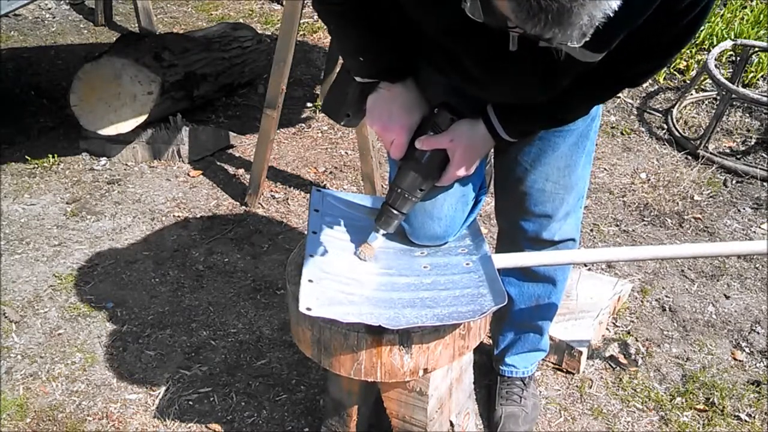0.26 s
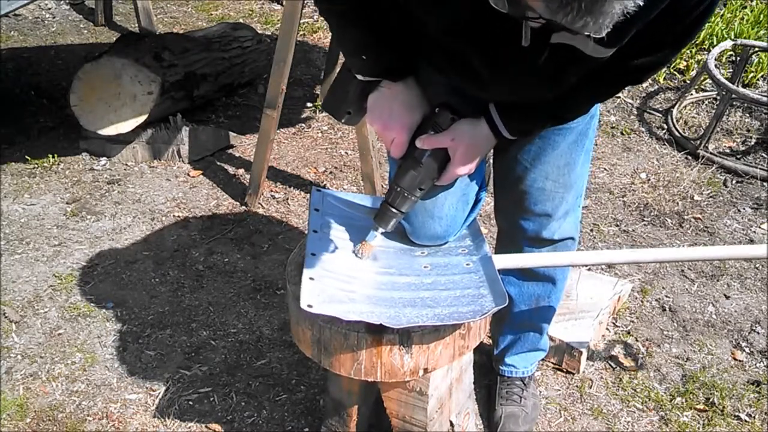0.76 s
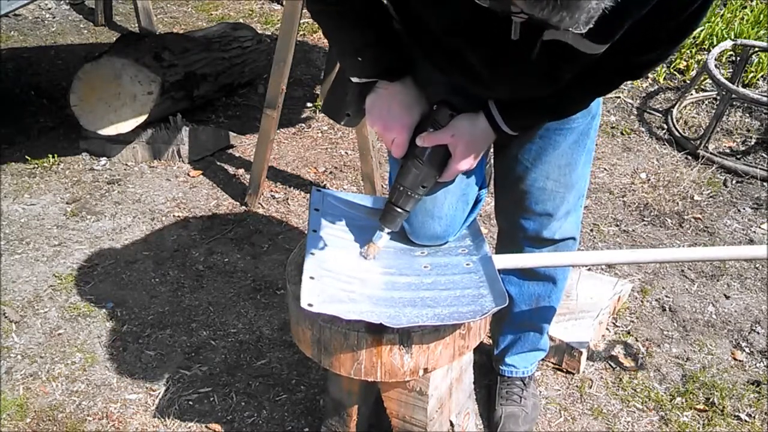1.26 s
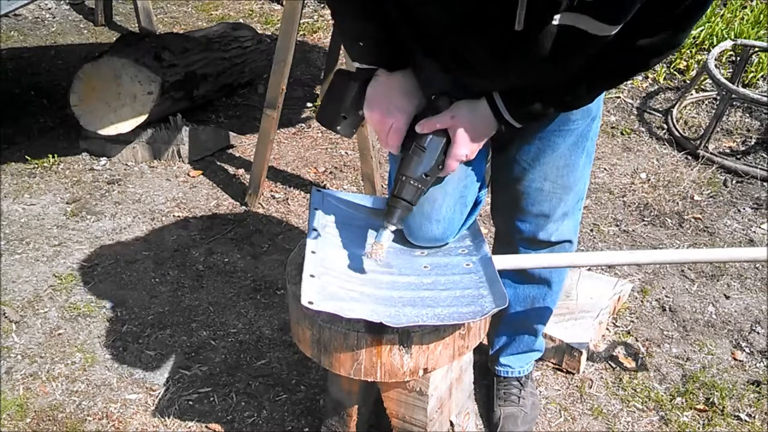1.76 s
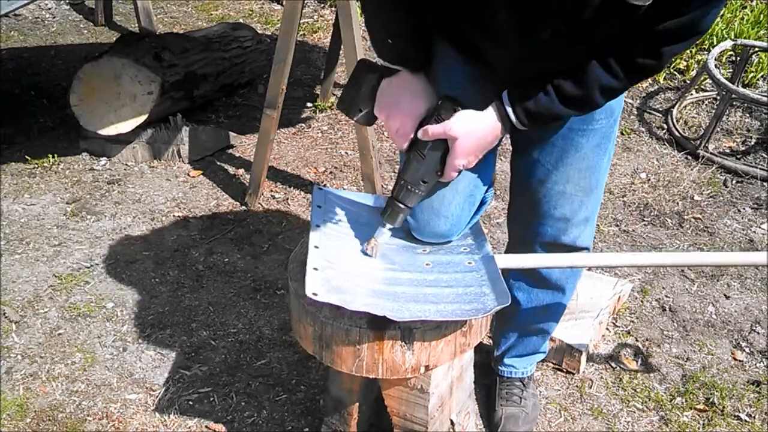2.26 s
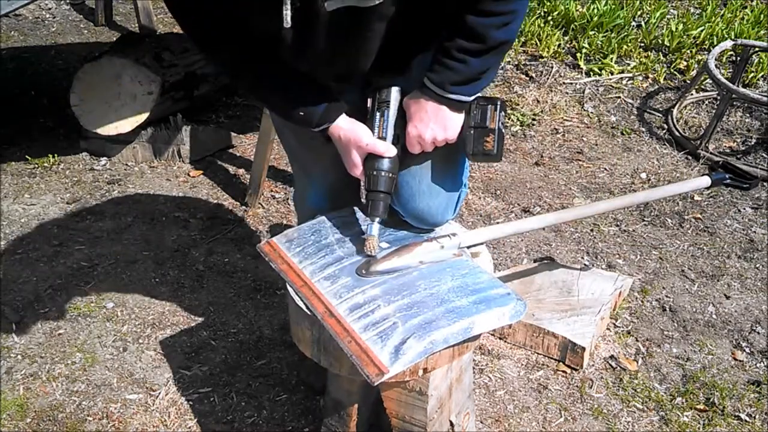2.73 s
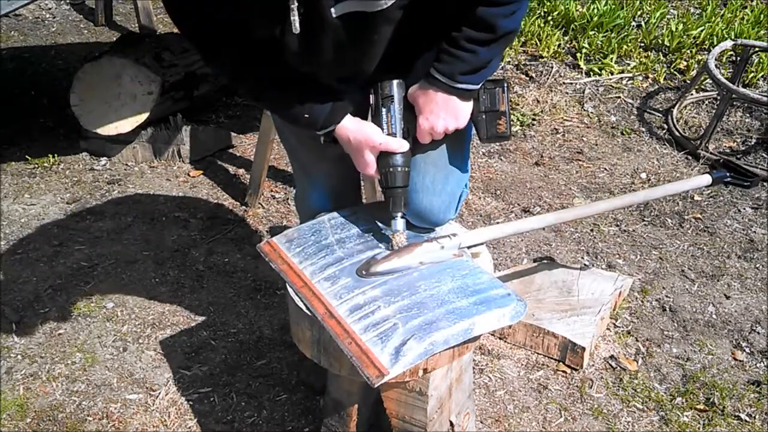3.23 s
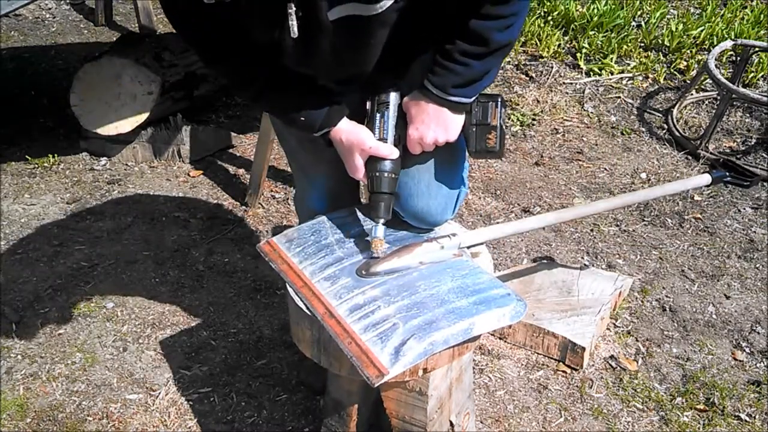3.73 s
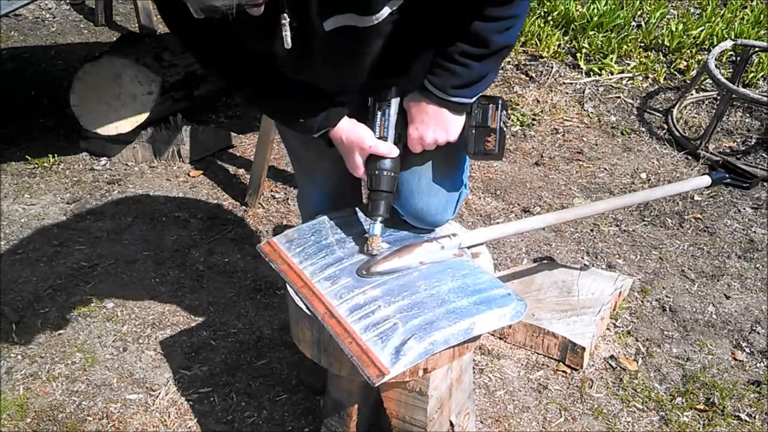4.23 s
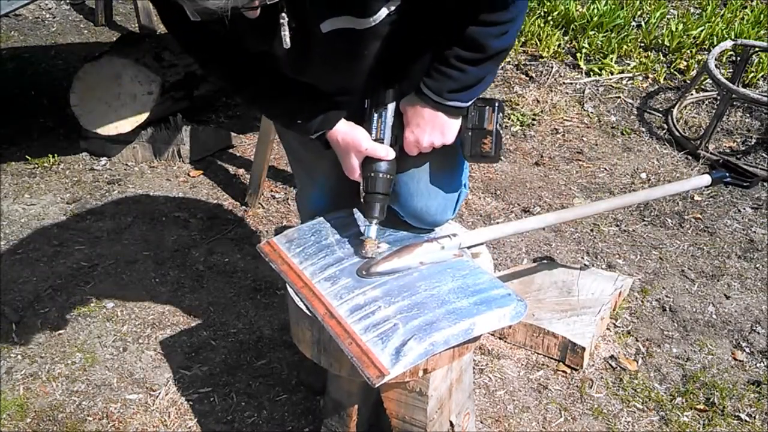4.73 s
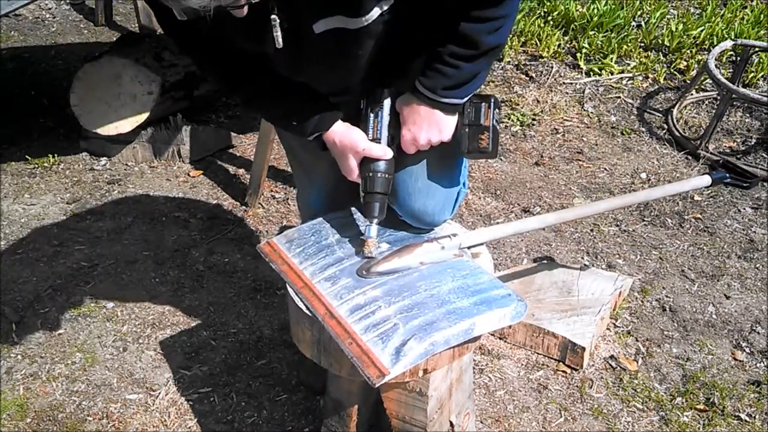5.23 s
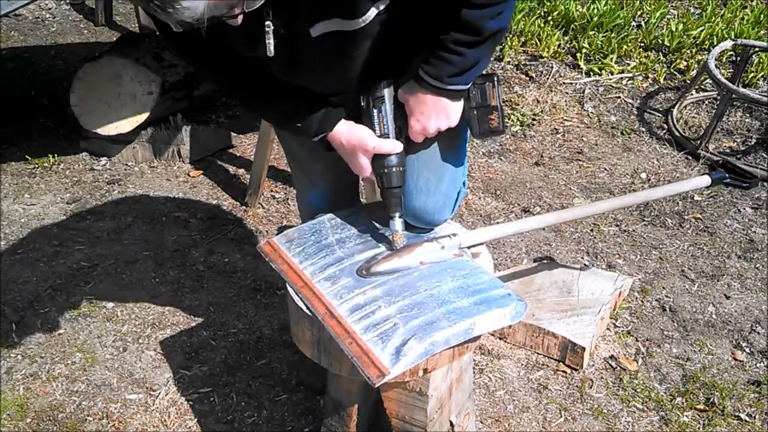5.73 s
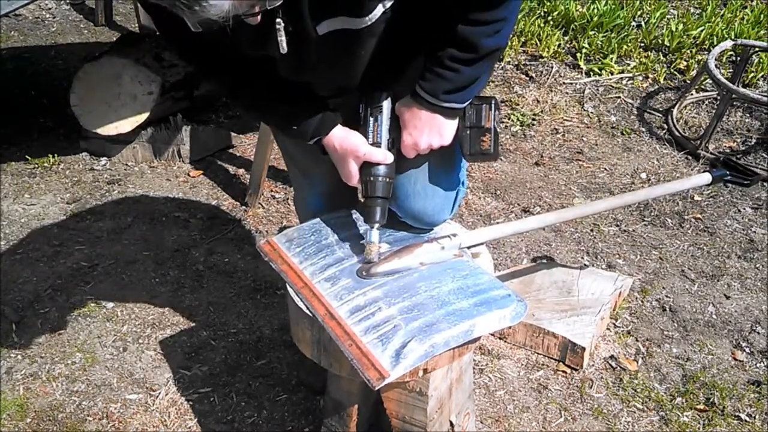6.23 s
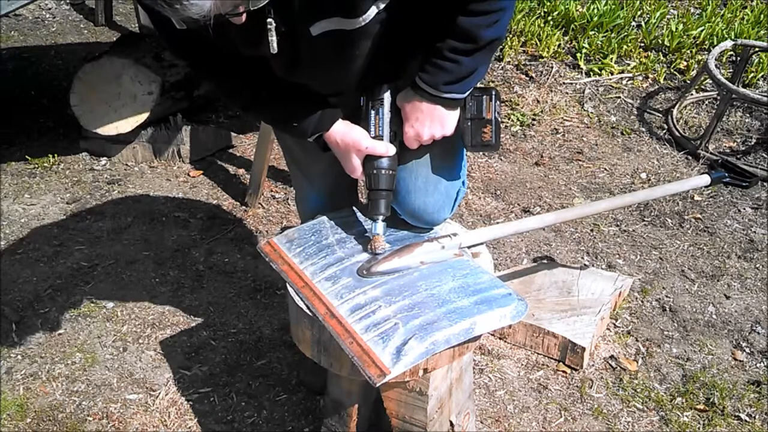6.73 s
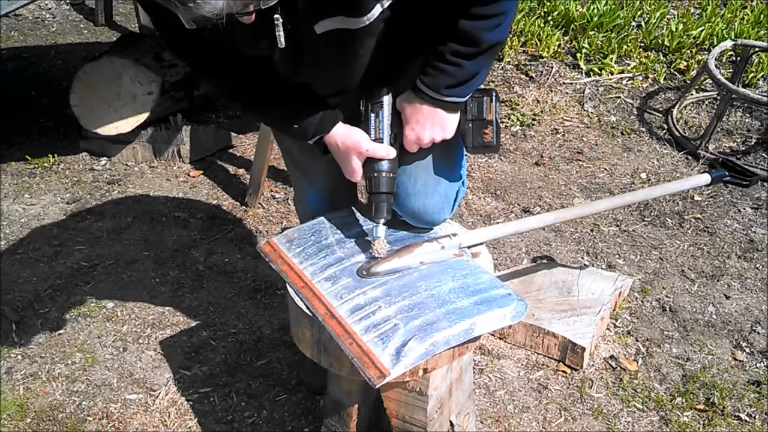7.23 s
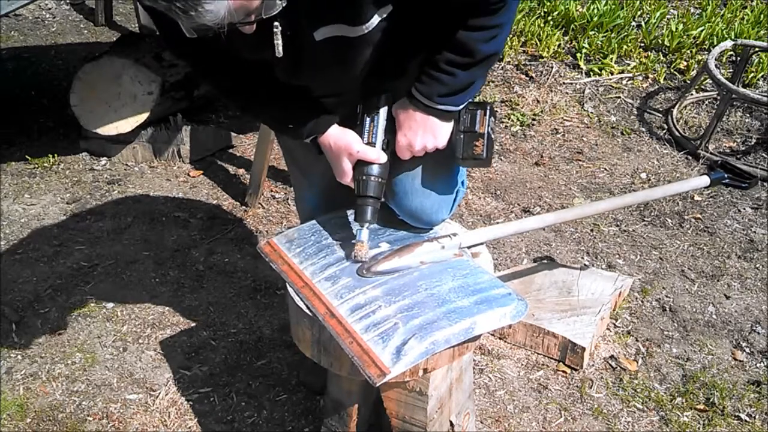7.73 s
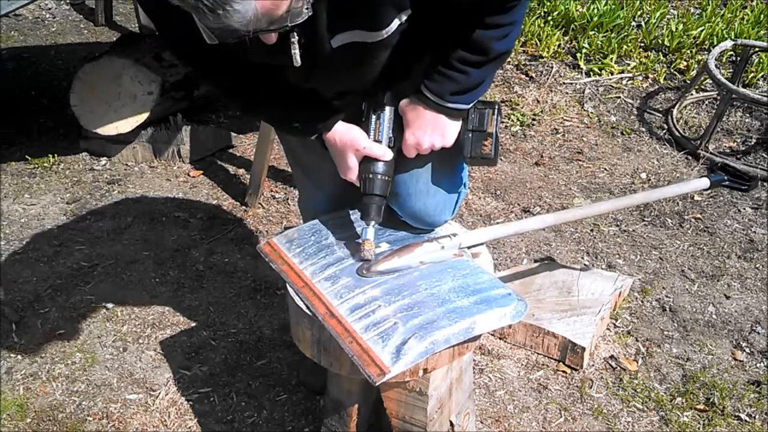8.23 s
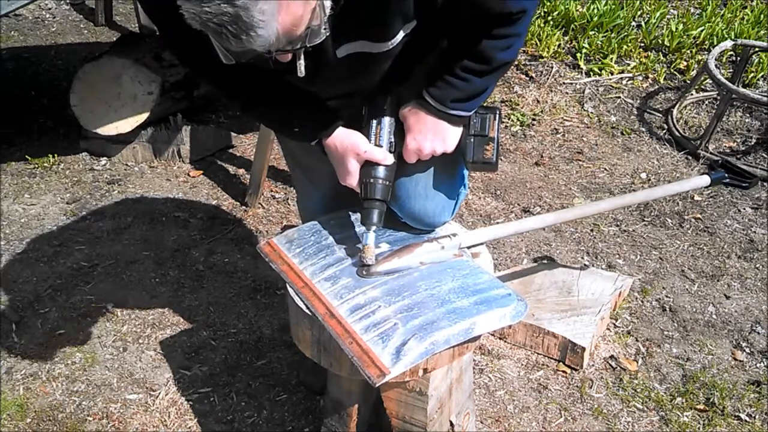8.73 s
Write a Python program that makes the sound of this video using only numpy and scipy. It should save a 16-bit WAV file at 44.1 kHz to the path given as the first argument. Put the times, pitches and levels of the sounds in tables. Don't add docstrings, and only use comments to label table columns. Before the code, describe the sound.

A cordless drill's wire brush scrapes and rings a sheet-metal shovel blade outdoors, pauses briefly with clicks, then restarts louder in rough, uneven strokes.

```python
import sys
import numpy as np
from scipy import signal
from scipy.fft import rfft, irfft, next_fast_len
from scipy.io import wavfile

SR = 44100
rng = np.random.default_rng(int(sys.argv[2]) if len(sys.argv) > 2 else 0)


def dump(signal):
    limited = np.clip(np.atleast_2d(signal).T, -1, 1)
    pcm = np.round(limited * 32767).astype(np.int16)
    wavfile.write(sys.argv[1], SR, pcm)


def nominal_scale(level):
    x = np.asarray(level, float) / 20
    return 10 ** x


N = 396004
OTHER_FACE_S = 2.418


def rms_one(x):
    return x / np.sqrt(np.mean(x ** 2) + 1e-20)


def in_time(tables):
    s, *columns = np.transpose(np.concatenate(tables))
    return [np.interp(np.arange(N) / SR, s, column) for column in columns]


def humps(rows):
    t = np.arange(N) / SR
    return sum(db * np.clip(1 - np.abs(t - s) / half, 0, 1) for s, db, half in rows)


def drift(rate):
    r = np.exp(-80 * np.pi * rate / SR)
    noise = rng.standard_normal(N // 40 + 2002)
    slow = signal.lfilter([1], [1, -2 * r, r * r], noise)[2000:]
    return np.interp(np.arange(N) / 40, np.arange(len(slow)), rms_one(slow))


def colour(x, spectrum, ripple_db, ripple_hz):
    size = next_fast_len(N)
    hz = np.arange(1, size // 2 + 2) * SR / size
    points, lines = np.array(spectrum), rfft(x, size)
    smooth_db = np.interp(np.log(hz), np.log(points[:, 0]), points[:, 1])
    out = np.zeros(N)
    for row in rng.standard_normal((3, 2000)):
        ripple = np.interp(hz / ripple_hz, np.arange(2000), np.minimum(row, 1.4))
        rippled = irfft(lines * nominal_scale(smooth_db + ripple_db * ripple), size)[:N]
        out += nominal_scale(4.27 * drift(1.64)) * rippled
    return rms_one(out)


def resonate(x, hz, width):
    r = np.exp(-np.pi * width / SR)
    poles = [1, -2 * r * np.cos(2 * np.pi * hz / SR), r * r]
    return signal.lfilter([(1 - r * r) / 2, 0, (r * r - 1) / 2], poles, x)


def faces(front, back):
    return np.where(np.arange(N) < OTHER_FACE_S * SR, rms_one(front), rms_one(back))


def yard():
    # (frequency [Hz], level [dB per Hz])
    traffic = [(30, -16), (80, 0), (200, 0.5), (450, -8.5), (1000, -15), (1500, -15.5), (2100, -21),
               (3300, -18.5), (6000, -24.5), (10000, -39), (15500, -43)]
    # (multiple of its turning rate, level [dB], change while it slows [dB])
    far_hum = [(1, -50, -11), (2, -62, -1), (3, -70, 15)]
    # (time [s], level [dB], half length [s])
    gusts = [(2.1, 17, 0.59), (3.7, 20, 0.41), (4.45, 11, 0.35), (6.4, 8, 0.93), (7.4, 20, 0.21),
             (8.98, 17, 0.39)]
    t = np.arange(N) / SR
    far = nominal_scale(-44 + 2.0 * drift(8.4)) * colour(rng.standard_normal(N), traffic, 2.5, 55.0)
    machine_hz = np.interp(t, [1.8, 1.92, 2.03, 2.2], [450, 440, 409, 400])
    turns = 2 * np.pi * np.cumsum(machine_hz) / SR
    slowed = np.clip((t - 1.85) / .25, 0, 1)
    hum = sum(nominal_scale(db + change_db * slowed + 3.0 * drift(12)) * np.sin(k * turns)
              for k, db, change_db in far_hum)
    rumble = signal.butter(2, [25, 110], "band", fs=SR, output="sos")
    wind = rms_one(signal.sosfilt(rumble, rng.standard_normal(N)))
    return far + hum + nominal_scale(-55.5 + humps(gusts) + 3.7 * drift(5.1)) * wind


def clicks():
    # (time [s], peak level [dB], knock frequency [Hz], t60 [s], share of crack [0-1])
    click_events = [
        (1.721, -8, 1050, 0.0066, 0.8),
        (1.884, -32, 864, 0.01, 0.8),
        (2.135, -20, 1230, 0.011, 0.54),
        (2.16, -30, 3970, 0.006, 0.8),
        (2.177, -29, 3980, 0.005, 0.8),
        (2.194, -33, 3300, 0.014, 0.8),
        (2.237, 2.5, 910, 0.007, 0.53),
    ]
    out, t = np.zeros(N), np.arange(3000) / SR
    cracks = rng.standard_normal((len(click_events), 3000))
    for (s, peak_db, hz, t60, share), crack in zip(click_events, cracks):
        at = round(s * SR)
        knock = np.sin(2 * np.pi * hz * t)
        dying = nominal_scale(peak_db - 0.5 - 60 * t / t60)
        out[at:at + len(t)] += dying * (share * crack + (1 - share) * knock)
    return signal.sosfilt(signal.butter(2, [600, 6500], "band", fs=SR, output="sos"), out)


def motor(ring_db):
    # (time [s], turning rate [turns per s])
    speeds = [
        [(0, 185), (.45, 182), (.7, 177), (.88, 181.5), (1, 173), (1.08, 165), (1.23, 160), (1.33, 164),
         (1.39, 172), (1.46, 187), (1.55, 200), (1.72, 150)],
        [(2.24, 150), (2.4, 198), (2.5, 185)],
        [(3.1, 180), (3.21, 187), (3.3, 200), (3.37, 208), (3.45, 204.5), (3.6, 196), (3.71, 191.5),
         (3.77, 182), (3.82, 170.5), (3.87, 162), (3.91, 161), (4, 153)],
        [(5.65, 175), (5.8, 192), (5.93, 187), (6.02, 182.5), (6.12, 180), (6.18, 175.5), (6.24, 169),
         (6.35, 160)],
        [(6.9, 155), (6.97, 166), (7.02, 176), (7.07, 182), (7.14, 184.5), (7.24, 181), (7.32, 177.5),
         (7.39, 168), (7.5, 155)],
        [(8.5, 172), (8.58, 178), (8.7, 187), (8.85, 189), (8.98, 184)],
    ]
    # (time [s], level [dB])
    runs = [
        [(0, -29), (.5, -26), (.88, -27), (1.06, -29), (1.24, -28), (1.38, -26), (1.5, -29), (1.6, -38),
         (1.72, -57)],
        [(2.24, -34), (2.4, -32), (2.5, -52.5)],
        [(3.14, -48), (3.22, -31), (3.3, -33), (3.38, -36), (3.47, -31), (3.6, -28), (3.72, -26), (3.8, -24),
         (3.92, -24), (4.02, -45)],
        [(5.7, -46), (5.85, -36), (5.94, -23), (6.1, -21), (6.22, -23), (6.3, -40)],
        [(6.92, -46), (6.99, -27), (7.05, -23), (7.15, -20), (7.3, -22), (7.39, -24), (7.46, -45)],
        [(8.5, -47), (8.6, -36), (8.75, -30), (8.9, -28), (8.98, -32)],
    ]
    # (from time [s], multiple 10 [dB re whine], multiple 20 [dB], multiple 30 [dB])
    grips = np.array([(-1, 3, 10, -10), (.92, -3, -2, -5), (1.06, -3, -2, 3), (1.41, 0, -3, -15),
                      (2.2, 0, -4, -20), (3, -3, 1, -25), (3.72, -2, -9, -25), (5, -3, -12, -20),
                      (8, -2, -9, -20)])
    # (frequency [Hz], level [dB])
    housing = [(1600, -5), (1830, -2), (2050, -10), (3350, -16), (3650, -13), (4050, 0), (4900, 2),
               (5900, -7)]
    # (multiple of turning rate, level [dB re blade ring])
    imbalance = [(1, -19.5), (2, -19), (3, -14)]
    (speed,), (whine_db,) = in_time(speeds), in_time(runs)
    t = np.arange(N) / SR
    free = (t >= OTHER_FACE_S) * np.clip((whine_db + 44) / 5, 0, 1)
    wobble = 1.0 + (0.4 - 1.0) * free
    grain = .4 + (.28 - .4) * free
    brush_turns = 2 * np.pi * np.cumsum(speed) / SR / 13.5
    sway = .013 * (t < OTHER_FACE_S) * np.sin(brush_turns + 2.6)
    unsteady = speed * (1 + sway + wobble / 300 * (drift(70) + drift(12)))
    turns = 2 * np.pi * np.cumsum(unsteady) / SR
    hum = sum(nominal_scale(ring_db + db + 3.6 * drift(16.0)) * np.sin(k * turns) for k, db in imbalance)
    grip_db = grips[np.searchsorted(grips[:, 0], t, "right") - 1, 1:].T
    whine = np.zeros(N)
    for k, db in enumerate(grip_db, 1):
        housing_db = np.interp(10 * k * speed, *np.transpose(housing))
        line = np.sin(10 * k * turns) * (1 + grain * drift(67))
        smear = grain * drift(66) * np.cos(10 * k * turns)
        whine += nominal_scale(whine_db + db + housing_db + 1.5 * drift(23)) * (line + smear)
    return hum + whine


def snags():
    # (time [s], level [dB], dying time [s])
    snag_events = [(.765, 1.5, .03), (2.417, 6.5, 0.022), (2.592, 5.5, 0.019), (3.07, -1.5, 0.033),
                   (3.683, 3.5, 0.028), (3.762, 0.5, .03), (3.929, 1.5, 0.04), (4.438, 1.5, 0.038),
                   (4.558, 7, 0.021), (5.486, -2, 0.037), (6.108, 0, 0.038), (6.235, -4.5, 0.042),
                   (6.287, 5.5, 0.024), (6.377, 2, 0.033), (6.697, 0, 0.027), (6.771, 1.5, 0.037),
                   (6.821, 3.5, 0.05), (7.309, -1, 0.034), (7.585, 2.5, 0.024), (7.815, 4, 0.016),
                   (7.895, 4, 0.011), (7.97, 3.5, 0.04), (8.125, 6, 0.016), (8.228, 7.5, 0.023),
                   (8.498, 10, 0.043), (8.593, 5, .03), (8.709, -2, 0.023), (8.756, -2, 0.017),
                   (8.812, 5, .04), (8.891, 5, 0.022), (8.924, 5, 0.015)]
    t = np.arange(N) / SR
    return sum(db * (t >= s) * np.exp(-np.abs(t - s) / dying) for s, db, dying in snag_events)


def contact():
    # (start [s], length [s], pressure as blade ring [dB], swell over the stroke [dB],
    # flick of free tips [dB])
    strokes = [(0, 1.29, -29.5, 1, 2.5), (1.2, 0.37, -29, 3, -3), (1.594, 0.097, -43.5, 3, -5),
               (2.208, 0.21, -30, 0.5, 3.5), (2.413, 0.7, -23.5, 3, -6.5), (3.096, 0.37, -34, -2.5, 2),
               (3.408, 0.38, -31.5, 3.5, 1), (3.815, 0.14, -27.5, -6.5, -9), (3.897, 1.07, -22.5, -1.5, -5),
               (4.94, 0.25, -29, 4.5, -7), (5.098, 0.57, -22.5, -1, -6), (5.692, 0.62, -36.5, 10.5, -0.5),
               (6.346, 0.63, -21, -3.5, -6), (6.984, 0.38, -33, 4.5, 3.5), (7.405, 0.18, -29.5, -8.5, -1.5),
               (7.555, 0.16, -19.5, -9.5, -3), (7.727, 0.26, -25, 2.5, -5.5), (8.07, 0.16, -34.5, 3, -7),
               (8.202, 0.024, -26.5, 2.5, 0), (8.27, 0.04, -29, 6.5, -3), (8.299, 0.15, -19.5, -8, -7.5),
               (8.466, 0.57, -38.5, 11, -1.5)]
    # (time [s], level [dB], half length [s])
    jolts = [(.05, -1, 0.043), (8.06, -2, 0.034), (7.75, -4, 0.015), (.49, -3, 0.054), (.696, -2, 0.034),
             (.776, 4.5, 0.017), (1.182, -1, 0.034), (1.412, 3.5, 0.13), (1.694, 3, 0.018),
             (1.724, 15.5, 0.011), (2.46, 3, 0.014), (2.6, -1, 0.028), (2.63, -8, 0.013), (2.8, 3.5, 0.027),
             (3.71, 5, 0.019), (3.79, 8, 0.036), (3.94, 3.5, .015), (4.02, -1.5, 0.11), (4.2, 2.5, 0.045),
             (4.29, 6.5, 0.028), (4.37, 0, 0.12), (5.52, 3, 0.11), (6.24, 11.5, 0.0092), (6.3, -7, 0.0091),
             (7.41, 15.5, 0.033), (7.54, 6, 0.026), (8.37, 3.5, 0.042), (8.62, 7.5, 0.015),
             (8.66, -4.5, 0.043), (4.8, 2, .15), (7.66, 2, 0.048), (7.552, 4, .015), (7.573, -2.5, 0.011),
             (1.0, -1.5, 0.11), (5, 1.5, 0.034), (5.35, -0.5, .1), (8.14, -2, .05), (5.2, 2, 0.04),
             (8.93, 2.5, 0.021)]
    # (from [s], to [s], level [dB])
    hop_events = [(8.447, 8.499, -6.5), (8.468, 8.499, -4.5), (3.815, 3.92, -0.5), (8.04, 8.085, -4.5)]
    land_s, lift_t60_s, lifted_db = 0.029, 0.3, -46.5
    t = np.arange(N) / SR
    out = np.full((3, N), lifted_db)
    for s, length, db, swell_db, flick_db in strokes:
        pressure = db + 30 + swell_db * np.clip((t - s) / length, 0, 1)
        landing = -20 * np.clip((s + land_s - t) / land_s, 0, None) ** 2 * (s > 0)
        lifting = -60 * np.clip(t - s - length, 0, None) / lift_t60_s
        levels = [pressure - 30,
                  -28 + 0.96 * pressure + 0.34 * flick_db,
                  -32 + 0.039 * pressure + flick_db]
        out = np.maximum(out, levels + (landing + lifting))
    hops = sum(db * ((t >= s) & (t < end)) for s, end, db in hop_events)
    jolt_shares = [[1], [0.96], [0.073]]
    return hops + out + (humps(jolts) + snags()) * jolt_shares


def wire_tips(per_s, spread_db, clump_db):
    sizes = nominal_scale(spread_db * np.minimum(rng.exponential(1, N), 5)) * rng.choice([-1, 1], N)
    clumps = nominal_scale(clump_db * (drift(14.4) + drift(140.0)))
    return rms_one(sizes * (rng.random(N) < per_s / SR) * clumps)


def modes(tips, table, wander_db):
    out = np.zeros(N)
    for k, (hz, width, db) in enumerate(table):
        out += (-1) ** k * nominal_scale(db + wander_db * drift(2.8)) * resonate(tips, hz, width)
    return rms_one(out)


def scrape(scrape_db, hiss_db):
    # (frequency [Hz], width [Hz], level [dB])
    front_upper = [(2400, 58, 3), (3050, 240, 17), (3180, 83, -11), (3680, 22, 12), (3860, 66, -7),
                   (4100, 31, -18), (4600, 48, -24), (4890, 98, 13.5), (5870, 160, 11), (6230, 35, -13),
                   (6600, 150, -4), (6890, 43, 20)]
    back_upper = [(2450, 66, 12.5), (2640, 80, -23), (2840, 20, 10), (3180, 44, 18), (3260, 26, -25),
                  (4005, 65, 15.5), (4030, 11, 16), (4604, 70, 10.5), (5100, 11, -8), (4930, 67, 15),
                  (7060, 27, -32), (7100, 65, -16)]
    # (frequency [Hz], level [dB per Hz])
    rasp_spectrum = [(800, -10.5), (1500, -17), (2200, -1), (3200, -4.5), (4500, -6), (6000, -5.5),
                     (9000, -13.5), (15000, -25)]
    hiss_spectrum = [(3000, -14.5), (5000, -4), (6500, -7), (8500, -4.5), (10000, -16), (12000, -16.5),
                     (14000, -25.5), (16000, -7.5)]
    tips = wire_tips(12000, spread_db=1.0, clump_db=0.84)
    upper = faces(modes(tips, front_upper, wander_db=2), modes(tips, back_upper, wander_db=2))
    rasp = colour(tips, rasp_spectrum, 9.0, 60.0) + nominal_scale(-2.5) * upper
    hiss = colour(tips, hiss_spectrum, 0.69, 58)
    return nominal_scale(scrape_db + 3) * rms_one(rasp) + nominal_scale(hiss_db + 5.5) * hiss


def spots():
    # (time [s], half length [s], frequency [Hz], level [dB])
    spot_events = [(0.054, 0.058, 1740, -33), (0.304, 0.057, 1720, -30), (0.768, 0.045, 1713, -29),
                   (0.99, 0.093, 1708, -25), (1.4, 0.099, 1717, -32), (.96, .12, 2120, -33),
                   (.2, 0.21, 2130, -36), (.3, .15, 4150, -44), (.32, 0.085, 4680, -45),
                   (.88, .06, 4130, -37), (1.25, .15, 3700, -42), (1.34, 0.066, 4200, -41),
                   (1.2, .35, 494, -43), (1.35, 0.13, 181, -45), (1.3, 0.28, 367, -48), (2.6, .2, 1967, -28),
                   (2.72, .1, 2237, -30), (2.72, 0.092, 3900, -41), (2.68, 0.11, 4380, -40),
                   (3.1, .1, 4650, -43), (3.398, 0.1, 3253, -36), (3.517, 0.097, 1868, -32),
                   (3.75, 0.084, 1886, -28.5), (4.1, .06, 1967, -29), (4.25, .13, 2260, -30),
                   (4.164, 0.062, 3990, -26.5), (4.149, .15, 4360, -37), (4.16, .08, 3510, -34),
                   (4.4, 0.14, 4620, -35), (4.85, 0.088, 2260, -30), (4.907, .15, 3960, -33),
                   (5.1, 0.12, 4360, -39), (5.25, .1, 1960, -33), (5.542, 0.11, 1950, -33),
                   (5.52, .07, 3680, -35), (6.29, .04, 2470, -36), (6.5, 0.053, 2190, -26),
                   (7.09, 0.11, 3200, -40), (7.58, 0.073, 5100, -36), (7.84, .15, 1983, -32),
                   (7.913, 0.079, 3500, -32), (8.327, 0.13, 4560, -39), (8.63, 0.051, 5100, -39),
                   (8.882, 0.083, 3250, -37),
                   (0.44, 0.38, 550, -37), (.55, 0.18, 1320, -35.5), (1.41, 0.19, 600, -32.5),
                 (1.5, 0.046, 890, -31), (1.4, .1, 880, -33), (1.04, .2, 980, -37), (2.5, 0.11, 940, -27),
                 (3.15, .15, 750, -36), (3.6, 0.22, 690, -36), (3.766, 0.16, 980, -31.5),
                 (3.9, 0.11, 1400, -33), (4.603, .12, 1700, -35), (5.507, 0.21, 231, -34),
                 (5.553, .15, 300, -38), (6.097, 0.18, 530, -34), (6.553, 0.047, 473, -24.5),
                 (6.6, 0.14, 850, -25.5), (7.433, 0.067, 950, -27), (7.623, 0.047, 1200, -33),
                 (7.8, 0.29, 224, -37), (7.75, .2, 1300, -33), (8.37, 0.057, 1300, -27),
                 (8.6, 0.2, 960, -39), (6.148, 0.078, 1870, -26), (6.397, .06, 1700, -29),
                 (6.8, .12, 2100, -30), (6.29, 0.032, 4000, -32), (4.4, .04, 1800, -29)]
    tips, out = wire_tips(6000, spread_db=2.0, clump_db=0.5), np.zeros(N)
    for s, half, hz, db in spot_events:
        near = slice(max(round((s - 1.5 * half) * SR), 0), round((s + 1.5 * half) * SR))
        swell = np.clip(1.5 - np.abs(np.arange(N)[near] / SR - s) / half, 0, 1)
        out[near] += nominal_scale(db) * swell * rms_one(resonate(tips[near], hz, width=15))
    return out


def blade(ring_db):
    # (frequency [Hz], width [Hz], level [dB])
    front_modes = [(192.5, 17, 3), (387, 22, -29), (600.5, 22, 2.5), (666, 40, -7), (942, 63, -2),
                   (1322, 36, 2.5), (1660, 200, -4), (2160, 41, -19)]
    back_modes = [(225.6, 17.5, -11.5), (314, 16, -13), (465.5, 24.5, -3), (500.6, 23.6, -1),
                  (538, 17.8, -1), (674, 49, -10.5), (735, 13.5, -12), (828.4, 12, -4.5), (893.4, 13, -1.5),
                  (937.5, 30, -3), (968.6, 42, -7), (1116, 6, -4.5), (1187, 15, -30), (1307, 19.3, -7),
                  (1308, 44.4, -10), (1477, 21, -15), (1640, 45, -51), (1762, 86, -12.5),
                  (1973, 30.4, -9.5), (2255, 20, -4.5)]
    # (frequency [Hz], level [dB per Hz])
    front_bed = [(100, -48), (200, -33), (400, -23), (550, -2.5), (1000, 2), (1700, -5), (2500, -2),
                 (4000, -33)]
    back_bed = [(100, -20), (220, -1.5), (420, 3.5), (520, -5), (790, 11), (1000, 10.5), (1600, 12),
                (2500, -14), (6000, -39)]
    # (time [s], level [dB], half length [s])
    bites = [(1.48, -1, .2), (2.46, 22.5, 0.53), (4.1, 25, 0.34), (4.7, 23, 0.18), (5.2, 26, 0.25),
             (5.5, 29, 0.29), (6.4, 27.5, 0.44), (7.62, 26, 0.53), (7.9, 4.5, 0.61), (8.35, 10, 0.13)]
    rims = [(2.8, -9, 0.16), (3.55, 21, 0.17), (3.73, 20, 0.16), (4.8, 17, 0.18), (5.95, 12, 0.15),
            (6.2, 19, 0.4), (6.6, 5, 0.17), (7.3, 24, 0.18), (7.52, 31, 0.15), (7.8, 2, .12),
            (8.7, 16, 0.16), (8.85, 13, 0.1)]
    shakes = [(2.45, 20, 0.061), (2.75, -4, 0.16), (5.2, 14, 0.059), (5.57, 18, 0.12), (6.25, 29, 0.066),
              (7.6, 6, .08), (7.85, 20, 0.071), (8.35, 5, .1)]
    tips = wire_tips(6000, spread_db=2.0, clump_db=0.9)
    front = modes(tips, front_modes, wander_db=2.5) + nominal_scale(1.0) * colour(tips, front_bed, 4.0, 29.6)
    back = modes(tips, back_modes, wander_db=2.0) + nominal_scale(-9.0) * colour(tips, back_bed, 5.9, 31.09)
    ring = faces(front, back)
    bite = nominal_scale(-19.5 + humps(bites)) * resonate(ring, hz=1230, width=203)
    rim = nominal_scale(-12.5 + humps(rims)) * resonate(ring, hz=1900, width=104)
    shake = nominal_scale(-10.5 + humps(shakes)) * resonate(ring, hz=218, width=120)
    return nominal_scale(ring_db + 3.5) * (ring + bite + rim + shake)


def scene():
    # (time [s], level [dB])
    trigger = [
        (1.735, 0),
        (1.82, -45),
        (2.19, -45),
        (2.24, 0),
    ]
    ring_db, scrape_db, hiss_db = contact()
    brushing = blade(ring_db) + scrape(scrape_db, hiss_db) + motor(ring_db) + spots()
    drill = nominal_scale(in_time([trigger])[0]) * brushing
    drill = drill - 0.28 * resonate(drill, hz=3005, width=170)
    return np.tile(drill + clicks() + yard(), (2, 1))


def roll_off(x):
    return signal.sosfilt(signal.butter(12, 15600, fs=SR, output="sos"), x)


def record(dry):
    lag = 16
    left, late = dry[0], np.concatenate([np.zeros(lag), dry[1, :-lag]])
    mid, side = (left - late) / 2, (left + late) / 2
    zero, pole = 2 * np.pi * 616, 2 * np.pi * 1310
    b, a = signal.bilinear([1, 1.25 * zero, zero ** 2], [1, 1.86 * pole, pole ** 2], SR)
    scatter = rng.standard_normal(2500) * nominal_scale(-60 * np.arange(2500) / SR / 0.23)
    diffuse = signal.fftconvolve(side, scatter / np.linalg.norm(scatter))[:N]
    dull = signal.sosfilt(signal.butter(2, 1100, fs=SR, output="sos"), diffuse)
    bright = diffuse - dull
    side = signal.lfilter(b, a, side) + nominal_scale(-27.0) * dull + nominal_scale(-15.0) * bright
    mid = mid + nominal_scale(-49.0 + 11.0 * drift(12)) * bright
    amplifier_hiss = nominal_scale(-64) * rng.standard_normal((2, N))
    both = np.array([mid + side, mid - side]) + amplifier_hiss
    x = signal.sosfilt(signal.cheby2(12, 70, 16200, fs=SR, output="sos"), both)
    return roll_off(1.272 * np.tanh(x / 1.323))


dry = scene()
out = record(dry)
dump(out)
```